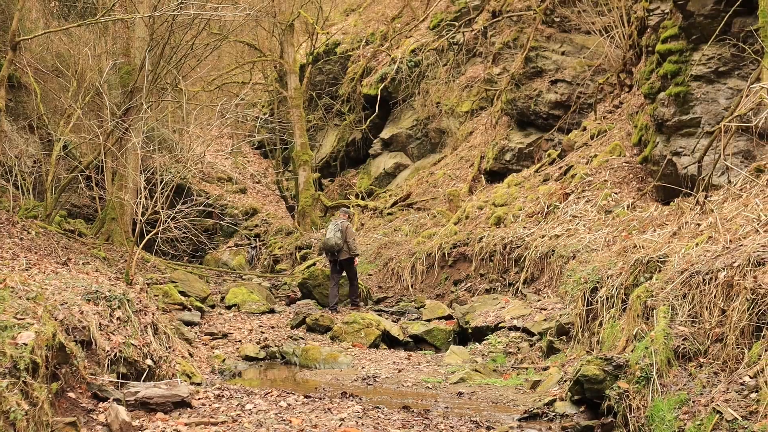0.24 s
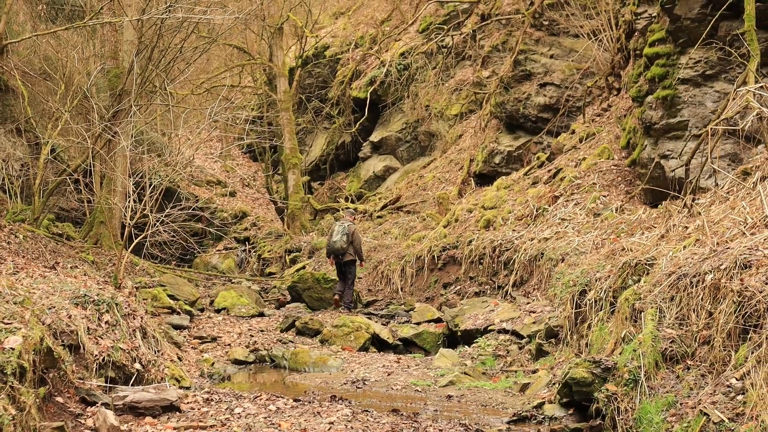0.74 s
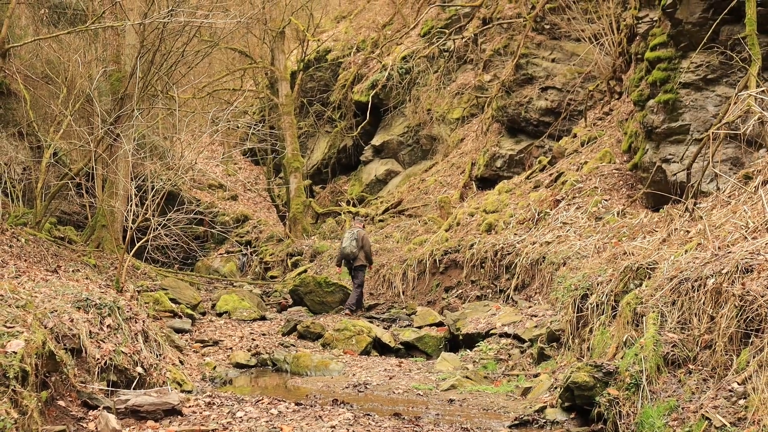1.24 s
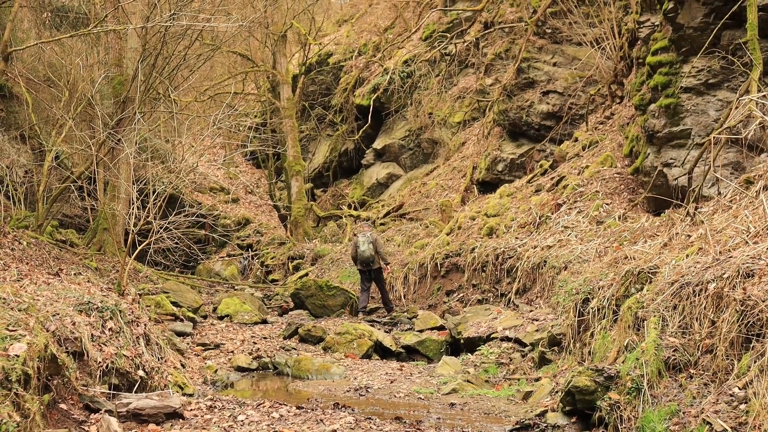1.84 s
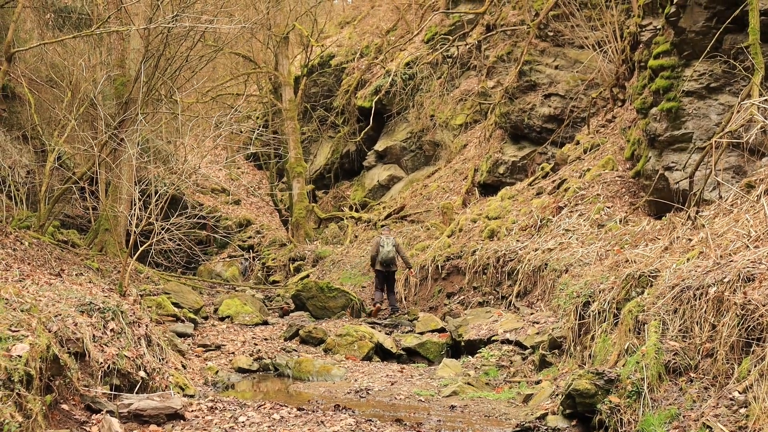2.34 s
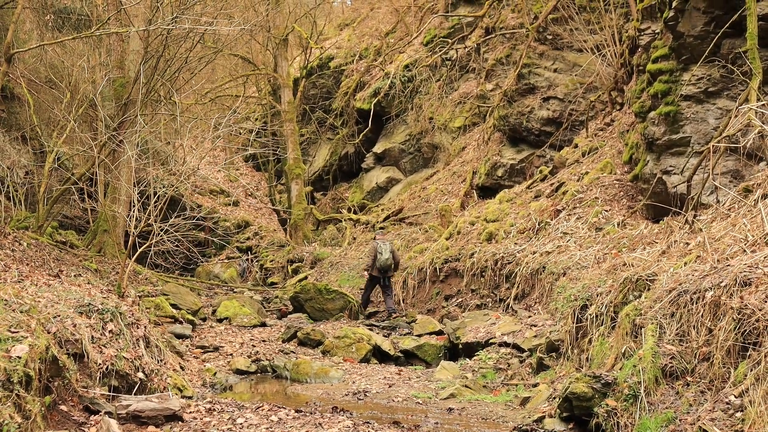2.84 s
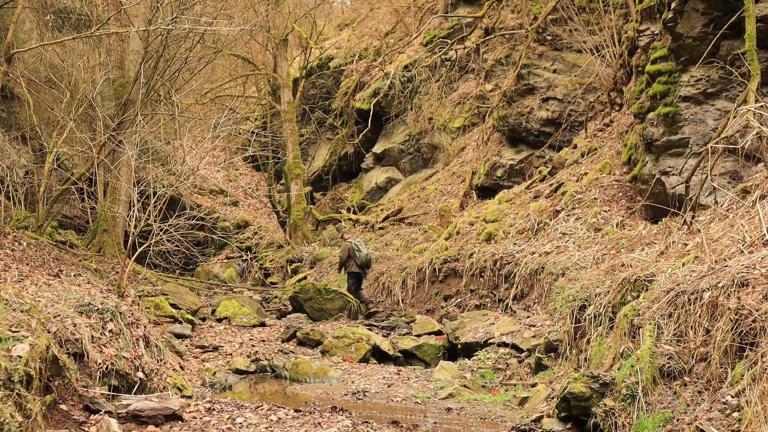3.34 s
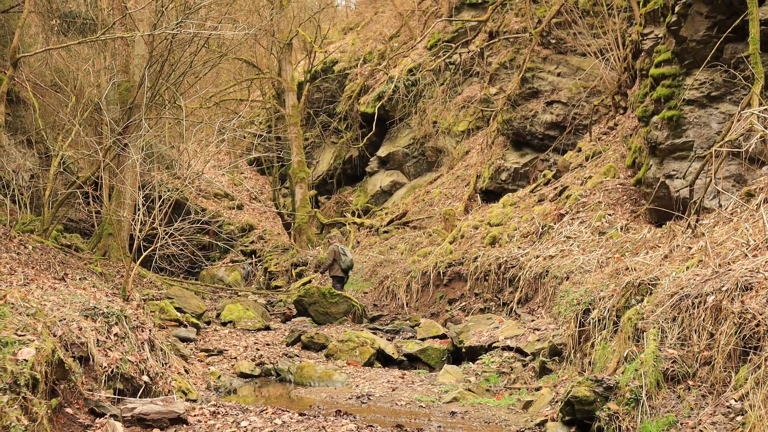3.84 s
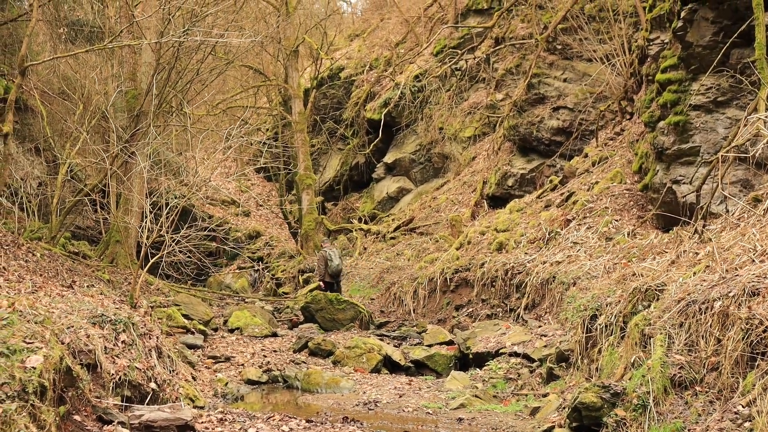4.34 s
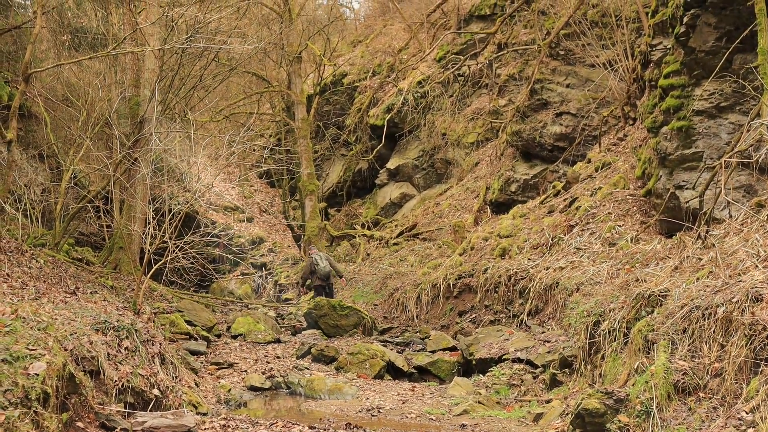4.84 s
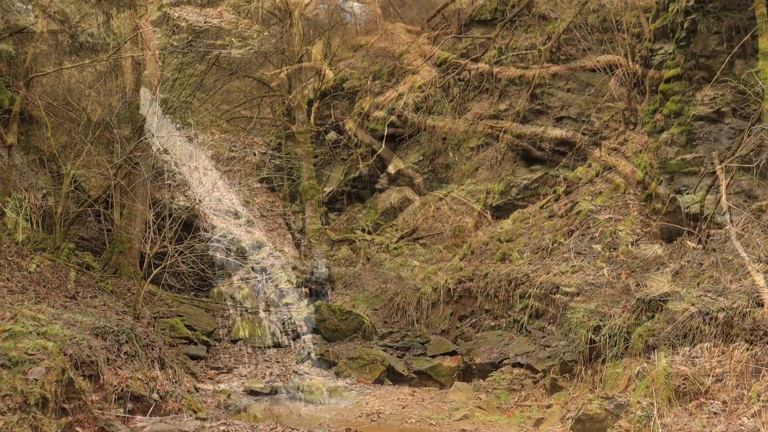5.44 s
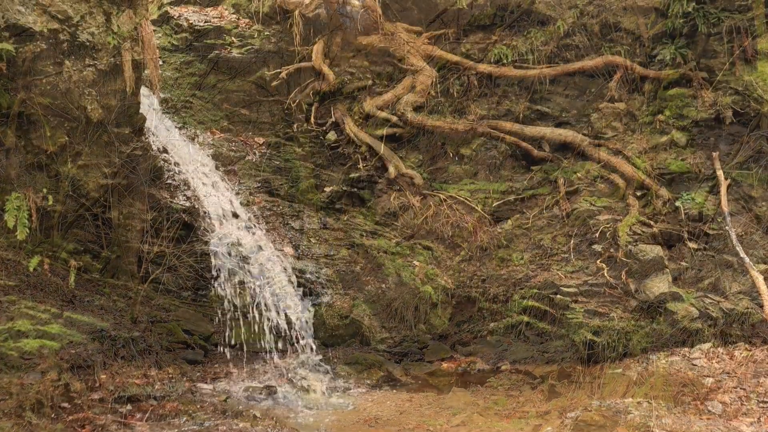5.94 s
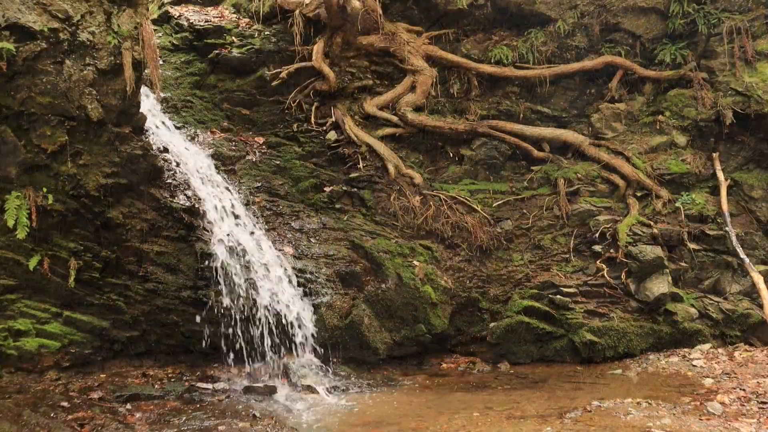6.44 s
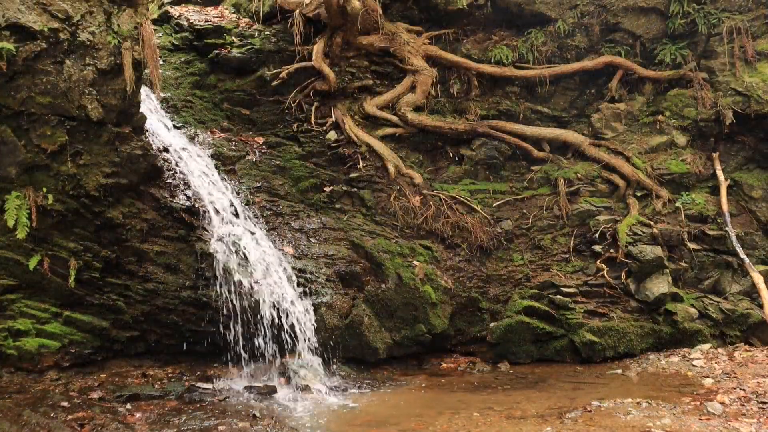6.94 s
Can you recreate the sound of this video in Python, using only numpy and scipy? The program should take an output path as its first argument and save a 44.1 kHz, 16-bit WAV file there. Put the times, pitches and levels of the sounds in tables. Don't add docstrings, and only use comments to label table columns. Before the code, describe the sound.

Soft brook water with ringing bubbles and one faint bird whistle, crossfading into a brighter waterfall slapping a pool with low gulps.

```python
import sys
import numpy as np
from scipy import signal
from scipy.fft import rfft, irfft, next_fast_len
from scipy.io import wavfile
from scipy.ndimage import uniform_filter1d, map_coordinates

SR = 44100
rng = np.random.default_rng(int(sys.argv[2]) if len(sys.argv) > 2 else 0)


def nominal_scale(level):
    x = np.asarray(level, float) / 20
    return 10 ** x


def generate_wav(sig):
    pcm = np.round(np.clip(np.atleast_2d(sig).T, -1, 1) * 32767).astype(np.int16)
    wavfile.write(sys.argv[1], SR, pcm)


N = 317079

# [f/Hz, level/dB]
BROOK_MID_SPECTRUM = [(65, -23), (110, -0.5), (218, 1), (600, -1), (1400, -4), (2080, -4), (3400, -10.5),
                      (5610, -18.5), (8140, -31.5), (8850, -35.5), (9800, -41), (15500, -75)]
BROOK_SIDE_SPECTRUM = [(65, -32), (110, -2.5), (329, -0.5), (1120, -1.5), (1560, -3), (3410, -1.5),
                       (5380, -7), (8850, -16.5), (10400, -24), (12000, -28.5), (13500, -35), (15500, -52)]
# [f/Hz, louder on the left -1..1, earlier on the left -1..1]
BROOK_DIRECTION = [(300, 0.019, -.25), (1000, -0.27, -.25), (2500, -0.2, -.25), (4000, 0.081, -.12),
                   (6000, -.05, -.05)]
# [f/Hz, level/dB]
RUMBLE_SPECTRUM = [(8.8, -38), (15, -3.5), (43, 4), (86, 3), (108, -3.5), (160, -5.5), (210, -26),
                   (350, -120)]
# [t/s, level/dB, half length/s]
GROUND_THUDS = [
    (2.2, 3, .1),
    (4.48, 6, 0.071),
    (6.66, 5, .08),
]
# [t/s, peak level/dB, f/Hz]
CLEAR_DRIPS = [(0.028, -30, 3300), (0.208, -29.5, 2090), (0.351, -27, 2540), (0.374, -25.5, 1970),
               (0.762, -32, 3320), (0.949, -26.5, 2130), (0.961, -31, 3790), (1.005, -29, 2180),
               (1.364, -23, 2580), (1.439, -32, 3230), (1.57, -30, 2470), (1.646, -30, 2150),
               (1.842, -25.5, 2030), (2.066, -31, 2410), (2.266, -27, 2200), (2.295, -33, 4630),
               (2.326, -23.5, 2870), (2.584, -31, 3330), (3.059, -29, 2020), (3.138, -29, 2140),
               (3.392, -30, 2210), (3.641, -33, 2220), (3.656, -26.5, 2380), (4.044, -32, 2970),
               (4.117, -23.5, 2000), (1.541, -31, 1980), (4.337, -33, 2320), (4.397, -36, 4610),
               (4.535, -34, 3960), (4.794, -26, 2370)]
# [t/s, peak level/dB, f/Hz, T60/s]
LARGE_BUBBLES = [(0.173, -24, 1190, 0.011), (0.209, -29, 1000, 0.02), (0.254, -30.5, 850, 0.061),
                 (0.39, -27, 1600, 0.015), (0.507, -28, 515, 0.019), (0.771, -25, 1110, 0.015),
                 (1.012, -29, 1700, 0.03), (1.014, -24.5, 1070, 0.029), (1.282, -30.5, 874, 0.031),
                 (1.342, -32, 1280, 0.029), (1.353, -30.5, 907, 0.044), (1.609, -28, 880, 0.026),
                 (1.718, -27, 1610, 0.015), (2.36, -30, 1250, 0.016), (2.373, -28, 1130, 0.023),
                 (2.821, -23.5, 1530, 0.017), (3.371, -29, 980, 0.022), (3.41, -29, 890, 0.049),
                 (3.741, -30.5, 1040, 0.02), (3.818, -27, 1080, 0.027), (3.964, -31, 1720, 0.014),
                 (4.21, -26, 965, 0.018), (4.236, -22, 1610, 0.015), (4.339, -27.5, 900, 0.028),
                 (4.404, -28.5, 1210, 0.089), (4.426, -30, 1640, 0.015), (4.471, -26, 960, 0.038),
                 (4.652, -32, 800, 0.03), (4.857, -30.5, 926, 0.035)]
# [t/s, peak level/dB, centre f/Hz]
DRY_TICKS = [(0.065, -40, 3320), (0.154, -35, 2400), (0.853, -40, 1600), (0.948, -38, 3720),
             (1.139, -43, 2500), (1.72, -43, 3900), (1.962, -37, 2000), (2.222, -40, 4300),
             (2.515, -40, 2000), (2.642, -40, 2300), (2.74, -39, 3100), (1.5384, -38, 3600),
             (2.2944, -41, 3000), (3.5465, -40, 4300), (3.8202, -41, 3400), (4.2545, -29.5, 3680),
             (4.3974, -42, 4080), (4.4603, -42, 3230)]
# [t/s, f/Hz, level/dB]
BIRD_WHISTLE = [
    (1.372, 3250, -62),
    (1.382, 3750, -56),
    (1.393, 4050, -57),
    (1.42, 4200, -61),
    (1.45, 4190, -59),
    (1.49, 4150, -59),
    (1.51, 4200, -62),
    (1.54, 4200, -61),
]
# [t/s, peak level/dB, f/Hz, T60/s]
AIR_GULPS = [(2.164, -38.5, 175, 0.073), (2.2, -36, 138, 0.038), (3.789, -35.5, 125, 0.033),
             (4.488, -39.5, 186, 0.03), (5.788, -34, 243, 0.039), (6.01, -33, 234, 0.047),
             (6.638, -26.5, 245, 0.038), (6.654, -35, 223, 0.035), (6.667, -31, 187, 0.044),
             (6.708, -22.5, 228, 0.028), (6.978, -36, 187, 0.042)]
# [f/Hz, level/dB]
FALL_MID_SPECTRUM = [(88, -30), (150, -10), (248, -7), (352, -12.5), (480, -3.5), (643, -1.5), (966, -4),
                     (2060, 0), (3900, -6.5), (6590, -15.5), (9000, -22.5), (13000, -40.5), (15500, -37)]
FALL_SIDE_SPECTRUM = [(88, -54), (150, -20), (681, -13), (966, -12.5), (1420, -5.5), (4140, -1), (6590, -8),
                      (9000, -17), (12000, -24), (15500, -33)]
# [f/Hz, louder on the left -1..1, earlier on the left -1..1]
FALL_DIRECTION = [(300, -0.028, .0), (1500, 0.24, 0.16), (2500, -0.26, .35), (4000, 0.27, .6),
                  (6500, 0.12, 0.28), (9000, 0.11, 0.43)]
FALL_LAYERS_DB = [-36.5, -30.5, -40.5]
FALL_SURGE_SHARE = [0.13, 1.14, 0.57]
# [t/s, level/dB, half length/s]
SHEET_SURGES = [(4.8, 3, 0.15), (5.09, 2, 0.089), (5.43, 2, .03), (5.732, 4, 0.021), (5.91, -1, 0.015),
                (5.98, 2.5, 0.029), (6.15, 2, .035), (6.47, 2, 0.02), (6.56, -0.5, .02), (6.62, 1, 0.043),
                (6.73, 2.2, 0.031), (6.86, 0.5, .04), (7.08, -1, 0.04)]
# [t/s, peak level/dB, f/Hz]
HARD_SLAPS = [(4.928, -22, 1930), (5.018, -20, 4730), (5.205, -21, 2400), (5.224, -19.5, 3370),
              (5.291, -19.5, 2130), (5.434, -20, 2750), (5.497, -16, 3200), (5.603, -12.5, 2600),
              (5.717, -10.5, 2310), (5.731, -11, 2110), (5.877, -12, 1820), (5.92, -18, 1600),
              (6.026, -15, 4740), (6.139, -7.5, 2060), (6.166, -14, 1900), (6.221, -13, 2020),
              (6.457, -8, 3420), (6.48, -9, 1960), (6.53, -11, 1860), (6.605, -11, 2160),
              (6.675, -18.5, 530), (6.698, -14, 1820), (6.719, -9, 1710), (6.765, -17, 1300),
              (6.88, -10.5, 2800), (6.904, -8, 4400), (6.973, -15, 780), (6.73, -12, 2500),
              (7.079, -16.5, 1510), (7.159, -18, 2670)]
# [t/s, f/Hz]
TREBLE_FOLD_EDGE = [(0, 10700), (4.5, 10700), (4.75, 10300), (4.95, 8300), (5.25, 8300), (5.27, 7600),
                    (5.87, 7600), (5.89, 6890), (7.19, 6890)]

BROOK_DB, BROOK_DRIFT_DB = -45.5, -0.22
CHANGE_FROM_S, CHANGE_TO_S, RISE_BEND, FADE_BEND = 4.62, 6.83, 1.023, 0.7
RUMBLE_DB, RUMBLE_AT_FALL_DB = -54.5, -57.5
DRIP_T60_S, DRIP_CYCLES = 0.0088, 21
TREBLE_FROM_HZ, TREBLE_FLUTTER_DB = 6700, 1.5


def unit(x):
    return x / np.sqrt(np.mean(x ** 2) + 1e-20)


def along(points, hz):
    f, *cols = np.transpose(points)
    return [np.interp(np.log(hz + 1), np.log(f + 1), c) for c in cols]


def curves(rows):
    s, *cols = np.transpose(rows)
    return [np.interp(np.arange(N) / SR, s, c) for c in cols]


def wobble(rate):
    knots = rng.standard_normal(int(N * rate / SR) + 4)
    return map_coordinates(knots, [np.arange(N) * rate / SR])


def bumps(rows):
    t = np.arange(N) / SR
    return sum(db * np.exp(-((t - s) / half) ** 2) for s, db, half in rows)


def change():
    return np.clip((np.arange(N) / SR - CHANGE_FROM_S) / (CHANGE_TO_S - CHANGE_FROM_S), 0, 1)


def filtered(x, response):
    m = next_fast_len(N + 8192)
    return irfft(rfft(x, m) * response(np.fft.rfftfreq(m, 1 / SR)), m)[..., :N]


def rings(s, gain, hz, t60, rise, size):
    t = np.arange(size) / SR
    age = t / t60[:, None]
    turns = hz[:, None] * t * (1 + rise * age)
    envelope = gain[:, None] * nominal_scale(-60 * age) * (1 - np.exp(-2.5 * turns))
    wave = envelope * np.sin(2 * np.pi * turns)
    at = np.round(s * SR).astype(int)[:, None] + np.arange(size)
    return np.bincount(at.ravel(), wave.ravel(), N + size + SR)[:N]


def plops(s, db, hz, t60, rise, splat_db):
    bubble = rings(s, nominal_scale(db), hz, t60, rise, size=5000)
    splat = rings(s, nominal_scale(db + splat_db), 1.35 * hz, 4 / hz, rise, size=1500)
    return bubble + splat


def stray(count, start, end, db, spread_db, hz, octaves):
    u = rng.standard_normal((count, 2))
    s = start + (end - start) * rng.random(count)
    return np.transpose([s, db + spread_db * u[:, 0], hz * 2 ** (octaves * u[:, 1])])


def froth(start, count, cycles, spread_db, clump_db, patchy_db, share, top_hz):
    when, size, strength = rng.random((count, 3)).T
    hz = 350 * (14000 / 350) ** size
    gain = hz * nominal_scale(np.minimum(-spread_db * np.log(1 - strength), 3 * spread_db))
    s = start + when * (N / SR - start)
    grains = rings(s, gain, hz, cycles / hz, rise=.15, size=500)
    grains = grains * nominal_scale(clump_db * (wobble(14) + wobble(45)))
    z = signal.stft(rng.standard_normal(N), nperseg=256)[2]
    field = uniform_filter1d(uniform_filter1d(rng.standard_normal(z.shape), 6, 0), 10, 1)
    hiss = signal.istft(z * nominal_scale(patchy_db * unit(field)), nperseg=256)[1][:N]

    def grainy(hz):
        return np.clip(share, 0, 1) / (1 + (hz / top_hz) ** 2)
    grains = grains / np.std(grains[round(start * SR):])
    grains = filtered(grains, lambda hz: np.sqrt(grainy(hz)))
    return grains + filtered(unit(hiss), lambda hz: np.sqrt(1 - grainy(hz)))


def ports(near, diffuse, mid_db, side_db, width_db, place):
    def direct(hz):
        lean, lead = along(place, hz)
        return nominal_scale(along(side_db, hz)[0] + width_db) * (lean + 1j * lead)

    def around(hz):
        lean, lead = along(place, hz)
        rest = np.sqrt(np.clip(1 - lean ** 2 - lead ** 2, 0, 1))
        return nominal_scale(along(side_db, hz)[0] + width_db) * rest
    mid = filtered(near, lambda hz: nominal_scale(along(mid_db, hz)[0]))
    side = filtered(near, direct) + filtered(diffuse, around)
    return np.array([mid + side, mid - side]) / np.std(mid)


def placed(x, lean_db, lead_s):
    side = np.array([[.5], [-.5]])
    return filtered(x, lambda hz: nominal_scale(lean_db * side) * np.exp(2j * np.pi * hz * lead_s * side))


def banks(x, t60, wet_db):
    t = np.arange(SR // 8) / SR
    tail = rng.standard_normal((2, len(t))) * nominal_scale(-60 * t / t60) * (t > .002)
    tail = tail / np.linalg.norm(tail[0])
    return x + nominal_scale(wet_db) * signal.fftconvolve(x, tail, axes=1)[:, :N]


def brook_rush():
    flow = nominal_scale(BROOK_DB + BROOK_DRIFT_DB * wobble(1.79)) * (1 - change()) ** FADE_BEND
    near = froth(0, count=4500, cycles=49, spread_db=2.0, clump_db=0.17,
                 patchy_db=0.6, share=0.2, top_hz=4460)
    far = froth(0, count=3000, cycles=40, spread_db=1.8, clump_db=.7,
                patchy_db=1.4, share=.15, top_hz=3000)
    return flow * ports(near, far, BROOK_MID_SPECTRUM, BROOK_SIDE_SPECTRUM,
                        width_db=-8.5, place=BROOK_DIRECTION)


def rumble():
    air = filtered(rng.standard_normal((2, N)), lambda hz: nominal_scale(along(RUMBLE_SPECTRUM, hz)[0]))
    mid, side = air / np.std(air) * nominal_scale([[0], [-30]])
    level_db = RUMBLE_DB + (RUMBLE_AT_FALL_DB - RUMBLE_DB) * change() ** .3 + bumps(GROUND_THUDS)
    return nominal_scale(level_db) * np.array([mid + side, mid - side])


def drips_and_bubbles():
    faint = stray(count=70, start=0, end=CHANGE_FROM_S, db=-39, spread_db=2.5, hz=2800, octaves=0.454)
    s, db, hz = np.vstack([CLEAR_DRIPS, faint]).T
    small = plops(s, db - 4.5, hz, DRIP_T60_S + DRIP_CYCLES / hz, rise=.03, splat_db=4.0)
    s, db, hz, t60 = np.transpose(LARGE_BUBBLES)
    large = plops(s, db - 4.0, hz, 1.08 * t60, rise=.03, splat_db=0.0)
    return banks(placed(large + small, lean_db=-3.0, lead_s=-0.000058), t60=0.14, wet_db=-13)


def ticks():
    s, db, hz = np.transpose(DRY_TICKS)
    body = rings(s, nominal_scale(db + 11.5), hz, 8 / hz, rise=.05, size=300)
    snap = rings(s, nominal_scale(db + 1), 1.7 * hz, 4 / hz, rise=.05, size=300)
    return banks(placed(body + snap, lean_db=-3.0, lead_s=-0.000045), t60=.04, wet_db=-10)


def bird():
    first, last = BIRD_WHISTLE[0], BIRD_WHISTLE[-1]
    silent_start, silent_end = (0, first[1], -120), (last[0] + .03, last[1], -120)
    hz, db = curves([silent_start, *BIRD_WHISTLE, silent_end])
    note = nominal_scale(db - 1.0 + 3 * wobble(41.0)) * np.sin(2 * np.pi * np.cumsum(hz) / SR)
    return placed(note, lean_db=8.0, lead_s=-0.000039)


def gulps():
    s, db, hz, t60 = np.transpose(AIR_GULPS)
    low_rings = plops(s + 0.0029, db + 5, hz, t60, rise=0.061, splat_db=-7)
    return placed(low_rings, lean_db=0.7, lead_s=-7e-5)


def waterfall_pour():
    start = round(CHANGE_FROM_S * SR)
    near = froth(CHANGE_FROM_S, count=8000, cycles=16.6, spread_db=2.0, clump_db=1.0,
                 patchy_db=1.14, share=0.31, top_hz=11000)
    far = froth(CHANGE_FROM_S, count=6000, cycles=13, spread_db=2.5, clump_db=-0.2,
                patchy_db=2.3, share=0.37, top_hz=11000)
    water = ports(near, far, FALL_MID_SPECTRUM, FALL_SIDE_SPECTRUM, width_db=-5, place=FALL_DIRECTION)

    def low(hz):
        return 1 / (1 + (hz / 1200) ** 4)

    def high(hz):
        return 1 / (1 + (5000 / (hz + 1)) ** 4)
    pool = filtered(water, low)
    sheet = filtered(water, lambda hz: 1 - low(hz) - high(hz))
    spray = filtered(water, high)
    surge_db, flutter = bumps(SHEET_SURGES), wobble(22)
    flutter_db = (.3, .5, .9)
    pour = 0
    for part, db, share, depth_db in zip((pool, sheet, spray), FALL_LAYERS_DB, FALL_SURGE_SHARE, flutter_db):
        level = nominal_scale(db + share * surge_db + depth_db * flutter)
        pour = pour + level * part / np.std(part.mean(0)[start:])
    return change() ** RISE_BEND * pour


def waterfall_slaps():
    s, db, hz = np.transpose(HARD_SLAPS)
    hard = plops(s, db - 6.5, hz, 0.0045 + 15 / hz, rise=0.023, splat_db=4.0)
    s, db, hz = stray(count=28, start=CHANGE_FROM_S, end=N / SR, db=-25.5,
                      spread_db=1.5, hz=2500, octaves=0.64).T
    loose = plops(s, db, hz, 0.0044 + 15 / hz, rise=0.021, splat_db=11.0)
    slaps = hard + change() ** RISE_BEND * loose
    return banks(placed(slaps, lean_db=-1.0, lead_s=5e-5), t60=0.041, wet_db=-9)


def scene():
    brook = brook_rush() + drips_and_bubbles()
    waterfall = waterfall_pour() + waterfall_slaps()
    return brook + rumble() + ticks() + bird() + gulps() + waterfall


def treble_flutter(x):
    hz, t, z = signal.stft(x, SR, nperseg=1024)
    field = rng.standard_normal(z.shape[1:])
    field = uniform_filter1d(uniform_filter1d(field, size=40, axis=0), size=3, axis=1)
    depth_db = TREBLE_FLUTTER_DB / (1 + (TREBLE_FROM_HZ / (hz + 1)) ** 6)
    return signal.istft(z * nominal_scale(depth_db[:, None] * unit(field)), SR, nperseg=1024)[1][:, :N]


def treble_fold(x, carry_db, flash):
    hz, t, (mid, side) = signal.stft([x[0] + x[1], x[0] - x[1]], SR, nperseg=2048)
    edge = np.interp(t, *np.transpose(TREBLE_FOLD_EDGE))
    flicker = np.sign(uniform_filter1d(rng.standard_normal(len(t)), size=5))
    edge = edge + 345 * flicker * (edge > 10500)
    chance = rng.random((40, len(t)))[(hz // 690).astype(int)]
    chance = np.minimum(chance, np.roll(chance, 1, axis=1))
    stays_wide = chance <= flash * (edge < 9000) * (hz[:, None] < 12400)
    folded = (hz[:, None] > edge) & ~stays_wide
    centre = mid + nominal_scale(carry_db) * side * folded
    mid, side = signal.istft([centre, side * ~folded], SR, nperseg=2048)[1][:, :N]
    return np.array([mid + side, mid - side]) / 2


def low_pass(x):
    return signal.sosfilt(signal.butter(12, 15620, fs=SR, output="sos"), x)


def record(dry):
    mix = treble_fold(treble_flutter(dry), carry_db=0.0, flash=0.08) + 0.00038
    return low_pass(mix)


dry = scene()
out = record(dry)
generate_wav(out)
```